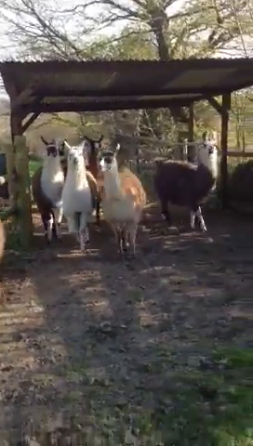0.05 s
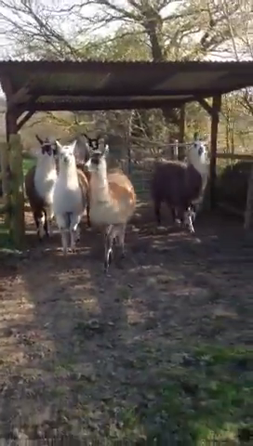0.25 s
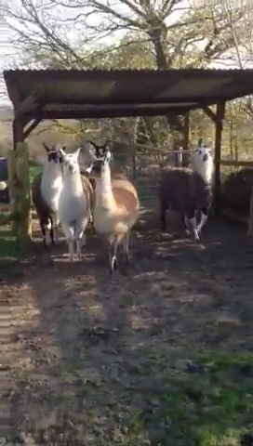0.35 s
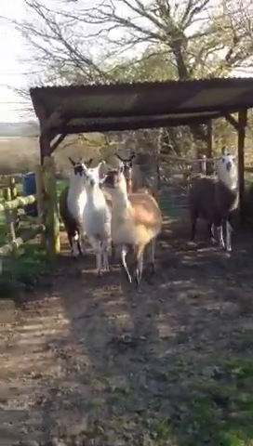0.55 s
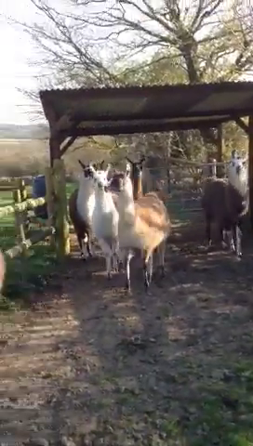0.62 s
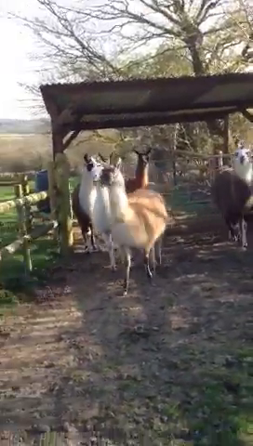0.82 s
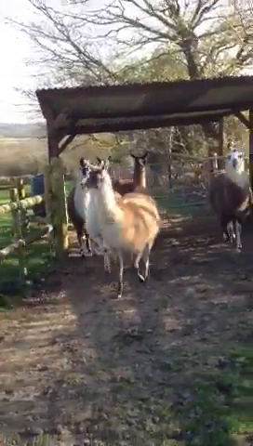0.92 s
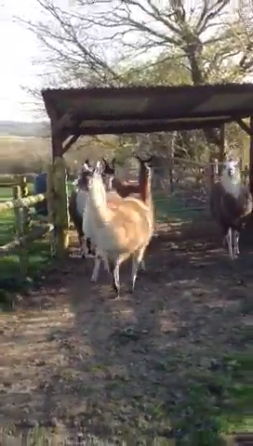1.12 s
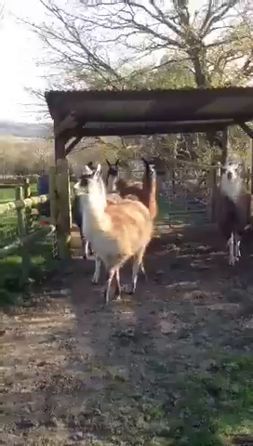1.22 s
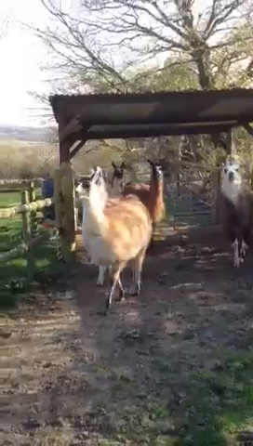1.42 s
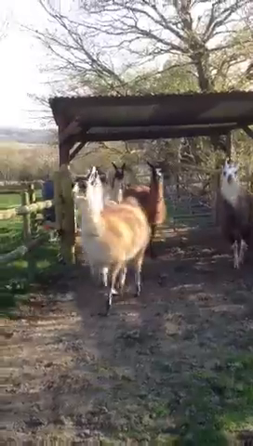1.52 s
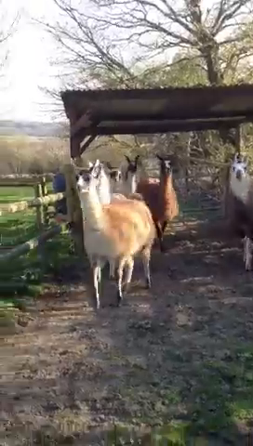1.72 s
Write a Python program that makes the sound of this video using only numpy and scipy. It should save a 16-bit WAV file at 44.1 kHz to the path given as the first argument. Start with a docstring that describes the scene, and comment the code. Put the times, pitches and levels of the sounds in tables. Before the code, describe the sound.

Songbirds warble and give thin high whistles over soft handling bumps and faint hiss.

```python
"""Birds over a still farm paddock.

A songbird warbles and trills nearby, another gives thin, very high whistles, and more call from the
trees. Each note is a wavering, nearly pure tone, scattered by nearby surfaces and the trees.
Dull handling bumps, ticks and rumble reach the hand-held microphone over a faint background hiss."""
import sys
import numpy as np
from scipy import signal
from scipy.fft import rfft, irfft
from scipy.io import wavfile

SR = 44100
rng = np.random.default_rng(int(sys.argv[2]) if len(sys.argv) > 2 else 0)


def materialize(psi):
    """Save the field psi as 16-bit PCM at rate SR to the path in sys.argv[1].

    A 1-D psi becomes a single channel; in a 2-D psi each row is a channel.
    """
    bounded = np.clip(np.atleast_2d(psi).T, -1, 1)
    quanta = np.round(bounded * 32767).astype(np.int16)
    wavfile.write(sys.argv[1], SR, quanta)


N = 77175
TIME = np.arange(N) / SR
NOTE_EDGE_S = 0.0065


def songbird(unsteady=0.01443, trill_hz=92, fade_db_per_s=103):
    """Near bird: gliding notes, plus trills that swing rapidly in pitch as they fade."""
    # per note: time_s, pitch_hz, level_db
    notes = [
        [(.006, 3114, -69), (.02, 2963, -52), (.032, 2907, -52), (.04, 2378, -64.5), (.057, 2415, -50)],
        [(.008, 4750, -59), (.016, 4950, -64), (.032, 4690, -60), (.037, 3560, -55.5), (.044, 2900, -50)],
        [(.138, 3150, -55), (.143, 2675, -56.5), (.146, 2070, -64), (.153, 1740, -61.5)],
        [(.179, 3810, -52), (.19, 4120, -69), (.198, 4120, -48.5), (.209, 4210, -53.5), (.218, 3820, -52)],
        [(.19, 3450, -56), (.205, 2930, -66), (.212, 2280, -60), (.238, 2306, -71)],
        [(.227, 4276, -52), (.231, 3400, -52.5), (.24, 3120, -66), (.246, 2800, -48.5), (.26, 2740, -60.5),
         (.266, 3730, -46)],
        [(.27, 3200, -52.5), (.276, 2750, -49), (.281, 2500, -64), (.295, 2477, -56), (.32, 2520, -74)],
        [(.303, 3000, -58), (.314, 3220, -41.5), (.323, 3520, -41.5), (.328, 2860, -51), (.336, 2356, -51.5),
         (.344, 3100, -49)],
        [(.433, 2964, -67), (.439, 2370, -54), (.449, 1780, -67)],
        [(.458, 3285, -52.5), (.466, 3008, -56.5), (.48, 3090, -57.5), (.58, 3047, -65)],
        [(.49, 3700, -61), (.499, 4390, -62), (.508, 4560, -59), (.52, 4230, -65)],
        [(.523, 4130, -58), (.54, 4270, -58), (.554, 4535, -61.5), (.592, 4350, -65)],
        [(.598, 3280, -68), (.614, 3283, -47.5), (.629, 3237, -48), (.637, 2440, -58.5)],
    ]
    # start_s, length_s, level_db, centre_hz, swing_ratio
    trills = [(0.064, 0.025, -59, 2500, 0.16), (0.218, 0.067, -52.5, 4560, 0.055),
              (.351, 0.048, -56, 2612, 0.19), (.639, 0.054, -58, 2400, .11)]
    out = song(notes, unsteady)
    for start_s, length_s, level_db, centre_hz, swing_ratio in trills:
        t = np.maximum(TIME - start_s, 0)
        pitch_hz = centre_hz * (1 - swing_ratio * np.cos(2 * np.pi * trill_hz * t))
        window = gate(start_s - NOTE_EDGE_S, start_s + length_s, NOTE_EDGE_S)
        out += whistle(pitch_hz, from_db(level_db - fade_db_per_s * t) * window, unsteady)
    return among_trees(out, wet_db=-7.5)


def high_whistler():
    """Second bird: thin whistles held near 7.4 kHz."""
    # per note: time_s, pitch_hz, level_db
    notes = [
        [(.824, 4300, -63), (.841, 5100, -71), (.849, 6730, -56), (.855, 7530, -52.5), (.862, 7350, -54),
         (.9, 7270, -60.5), (.96, 7320, -70)],
        [(.997, 4830, -62), (1.005, 6440, -56), (1.011, 7280, -49.5), (1.027, 7450, -41.5), (1.058, 7430, -59),
         (1.077, 7440, -43), (1.092, 7296, -60), (1.14, 7370, -62)],
        [(1.229, 6620, -74), (1.239, 7410, -55.5), (1.284, 7354, -55)],
        [(1.3, 7400, -62), (1.32, 7450, -61), (1.345, 7350, -68)],
        [(1.37, 7480, -68), (1.405, 7530, -62.5), (1.44, 7490, -71), (1.468, 7370, -66)],
    ]
    return among_trees(song(notes, unsteady=0.00335), wet_db=-7)


def far_birds():
    """Distant slurred calls, heavily scattered."""
    # start_s, length_s, level_db, start_hz, end_hz
    calls = [ (.153, 0.0068, -64, 4830, 4700), (.168, 0.025, -68, 5180, 4370),
             (.445, 0.035, -76, 5270, 5350), (.47, 0.13, -74, 3560, 3265), (.491, 0.095, -78.5, 7240, 6840),
             (.61, 0.019, -77, 5180, 4560), (.645, .028, -79, 6380, 6640), (.7, 0.041, -73.5, 6350, 6110),
             (.708, 0.028, -70.5, 3890, 3505), (.749, 0.0067, -69, 6050, 5220),
             (.755, 0.065, -70, 3243, 3097), (.76, 0.073, -77, 3610, 3590), (.79, 0.071, -80, 6230, 6400),
             (.844, 0.014, -66.5, 3760, 4070), (.855, 0.081, -74, 4720, 4730),
             (.877, 0.0167, -73, 3292, 3980), (.888, .017, -70, 3050, 3140), (1.03, .045, -72, 2800, 2364),
             (1.09, 0.038, -75.5, 4760, 4410), (1.101, 0.037, -68, 3093, 3032),
             (1.152, .045, -69, 2841, 2803), (1.21, 0.072, -87, 3040, 3060), (1.29, 0.014, -73, 3735, 3690),
             (1.305, 0.039, -77, 8050, 8430), (1.361, 0.043, -75.5, 2850, 2820),
             (1.38, 0.1, -86, 3540, 3580), (1.405, 0.064, -77.5, 2290, 2555),
             (1.453, 0.085, -70.5, 3080, 3000), (1.476, .042, -73.5, 7850, 8050),
             (1.529, .11, -80, 3060, 2892), (1.706, 0.024, -68, 3464, 3400),
             (1.711, 0.016, -70.5, 3600, 4330), ]
    return among_trees(slurs(calls, unsteady=0.012), wet_db=-1.5)


def fluting_bird():
    """Low, clear notes with little scatter."""
    # start_s, length_s, level_db, start_hz, end_hz
    calls = [(.84, 0.11, -79, 2035, 2293), (.895, 0.11, -76.5, 1095, 1106),
             (1.335, 0.14, -73.5, 1902, 1720)]
    return among_trees(slurs(calls, unsteady=0.007), wet_db=-13.5)


def chorus():
    """Distant song blurred into a band of noise."""
    # time_s, level_db
    levels = [(0, -60), (.11, -67.5), (.24, -67), (.36, -69), (.42, -67), (.52, -65.5), (.75, -70),
              (.9, -66.5), (1.2, -69.5), (1.55, -70), (1.75, -71)]
    # freq_hz, gain_db
    colour = [(1400, -23.5), (2200, 1), (2950, 4.5), (3800, -0.5), (4700, -1), (6500, -3), (9000, -19)]
    return noise(levels, colour)


def bumps(low_hz=104, high_hz=730):
    """Soft pushes on the microphone, each swelling and dying within a few low cycles."""
    # start_s, level_db, pitch_hz, swell_s
    pushes = [ (.002, -46.5, 129, 0.0027), (0.015, -40, 144, 0.0049), (0.105, -42.5, 124.5, 0.014),
              (0.127, -36, 158, 0.0063), (0.2355, -13, 194.5, 0.0025), (0.2453, -20.5, 173.4, 0.0083),
              (0.2545, -25, 255, 0.0018), (0.261, -33.5, 317, 0.0084), (0.2799, -18.5, 185, 0.0032),
              (.293, -36.5, 154.4, 0.011), (0.316, -32, 205, 0.0037), (.414, -47.5, 121, 0.0073),
              (0.459, -25, 171.4, 0.0062), (0.479, -23.5, 198, 0.004), (0.5143, -25, 264, 0.0024),
              (0.5193, -17.5, 249, 0.002), (0.551, -36, 222, 0.0062), (0.572, -31.5, 195, 0.0031),
              (0.598, -32.5, 145, 0.0034), (.638, -36, 175, 0.004), (0.661, -37.5, 183, 0.003),
              (0.718, -34, 145, 0.0048), (0.765, -38.5, 142, 0.0062), (0.801, -35.5, 157, 0.0041),
              (.859, -37, 142, 0.0066), (0.872, -32.5, 227, 0.0041), (0.888, -33, 163, 0.0024),
              (0.904, -40.5, 161.4, 0.012), (.929, -36, 146, 0.0048), (1.202, -54.5, 163, 0.0027),
              (1.28, -41.5, 187, 0.0049), (1.301, -45.5, 163, 0.0048), (1.334, -49.5, 213, 0.0039),
              (1.366, -43, 166.6, 0.0051), (1.4766, -48, 240, 0.0015), (1.528, -45.5, 135, 0.0057),
              (1.554, -48, 145, 0.005), (1.667, -45, 125, 0.0062), (1.723, -44, 157, 0.0047), ]
    out = np.zeros(N)
    for start_s, level_db, pitch_hz, swell_s in pushes:
        t = np.maximum(TIME - start_s, 0)
        envelope = (t / swell_s * np.exp(1 - t / swell_s)) ** 2
        out += from_db(level_db) * envelope * np.sin(2 * np.pi * pitch_hz * t)
    return butterworth(butterworth(out, 2, low_hz, "high"), 4, high_hz, "low")


def ticks(edge_ratio=1.466):
    """Light handling scuffs: tiny bursts of midrange noise."""
    # start_s, peak_db, centre_hz, decay_s
    scuffs = [(0.042, -56, 720, 0.017), (0.538, -42, 840, 0.0015), (0.663, -51, 480, 0.0074),
              (0.71, -46, 770, 0.0021), (0.79, -55, 770, 0.0024), (1.478, -55, 423, 0.0021)]
    out = np.zeros(N)
    for start_s, peak_db, centre_hz, decay_s in scuffs:
        envelope = (TIME > start_s) * np.exp(-np.abs(TIME - start_s) / decay_s)
        burst = rng.standard_normal(N) * envelope + 1e-18
        burst = butterworth(burst, 3, [centre_hz / edge_ratio, centre_hz * edge_ratio], "band")
        out += from_db(peak_db) * burst / np.abs(burst).max()
    return out


def rumble():
    """Low handling noise between the bumps."""
    # time_s, level_db
    levels = [(0, -55.5), (.09, -63), (.2, -74), (.29, -37), (.35, -76), (.44, -52), (.55, -37.5),
              (.69, -61.5), (.83, -60), (.91, -47), (.99, -76), (1.16, -77.5), (1.33, -59.5), (1.45, -70),
              (1.75, -62.5)]
    # freq_hz, gain_db
    colour = [(25, -68), (50, -22), (100, 3), (170, 2.5), (250, -15.5), (400, -16), (700, -33.5),
              (1500, -58)]
    return noise(levels, colour)


def hiss():
    """Faint steady background hiss, its level briefly rising about half a second in."""
    # time_s, level_db
    levels = [(0, -65), (.42, -67), (.49, -62), (.55, -64.5), (.72, -64.5), (1.5, -67)]
    # freq_hz, gain_db
    colour = [(25, -17), (60, 6.5), (150, 13.5), (300, 6), (600, 3.5), (1000, 2.5), (1500, 0.5), (3000, -7),
              (5000, -32.5), (7000, -4.5), (9500, -10), (15000, -5)]
    return noise(levels, colour)


def song(notes, unsteady):
    """Notes gliding along their pitch and level curves."""
    out = np.zeros(N)
    for note in notes:
        pitch_hz, level_db = in_time(note)
        window = gate(note[0][0] - NOTE_EDGE_S / 2, note[-1][0] + NOTE_EDGE_S / 2, NOTE_EDGE_S)
        out += whistle(pitch_hz, from_db(level_db) * window, unsteady)
    return out


def slurs(calls, unsteady):
    """Straight glides between two pitches."""
    out = np.zeros(N)
    for start_s, length_s, level_db, start_hz, end_hz in calls:
        end_s = start_s + length_s
        pitch_hz = np.interp(TIME, [start_s, end_s], [start_hz, end_hz])
        window = gate(start_s, end_s, edge_s=0.032 * length_s)
        out += whistle(pitch_hz, from_db(level_db) * window, unsteady)
    return out


def whistle(pitch_hz, gain, unsteady, flutter_db=1.5):
    """Bird tone wavering in pitch and level; unsteady is the rms share of the pitch."""
    phase = 2 * np.pi * np.cumsum(pitch_hz * (1 + unsteady * waver(cutoff_hz=214))) / SR
    flutter = from_db(flutter_db * waver(cutoff_hz=29))
    return np.sqrt(2) * gain * flutter * np.sin(phase)


def among_trees(direct, wet_db):
    """Direct sound, a tail from the trees and quick scatter from ground, fence and shelter."""
    trees = echo_cloud(t60_s=0.57, delay_s=0.012)
    nearby = from_db(-2) * echo_cloud(t60_s=0.086, delay_s=0.0046)
    return direct + from_db(wet_db) * signal.fftconvolve(direct, trees + nearby)[:N]


def echo_cloud(t60_s, delay_s):
    """Dense, dying echoes of unit energy."""
    t = TIME[:SR]
    echoes = rng.standard_normal(SR) * from_db(-60 * t / t60_s) * (t > delay_s)
    return echoes / np.linalg.norm(echoes)


def noise(levels, colour):
    """Coloured noise whose rms follows a level curve."""
    freq_hz, gain_db = np.transpose(colour)
    bins_hz = np.maximum(np.arange(N // 2 + 1) * SR / N, 1)
    shape = from_db(np.interp(np.log(bins_hz), np.log(freq_hz), gain_db))
    x = irfft(rfft(rng.standard_normal(N)) * shape, N)
    return from_db(in_time(levels)[0]) * x / x.std()


def waver(cutoff_hz):
    """Random unsteadiness, rms 1."""
    x = butterworth(rng.standard_normal(N), 2, cutoff_hz, "low")
    return x / x.std()


def gate(start_s, end_s, edge_s):
    """Window with smooth edges."""
    ramp = np.clip(np.minimum(TIME - start_s, end_s - TIME) / edge_s, 0, 1)
    return np.sin(np.pi / 2 * ramp) ** 2


def in_time(rows):
    """Breakpoint columns interpolated per sample."""
    time_s, *columns = np.transpose(rows)
    return [np.interp(TIME, time_s, column) for column in columns]


def butterworth(x, order, edges_hz, kind):
    return signal.sosfilt(signal.butter(order, edges_hz, kind, fs=SR, output="sos"), x)


def from_db(db):
    return 10 ** (np.asarray(db) / 20)


def scene():
    """Birds, handling noise and hiss, in mono."""
    near = from_db(-2) * songbird() + from_db(-2.5) * high_whistler()
    far = from_db(1) * far_birds() + fluting_bird() + chorus()
    handling = bumps() + ticks() + rumble()
    return (near + far + handling + hiss())[None]


def record(dry):
    """Steep low-pass."""
    cutoff_hz = 15400
    return signal.fftconvolve(dry, signal.firwin(511, cutoff_hz, fs=SR)[None], "same")


dry = scene()
out = record(dry)
materialize(out)
```